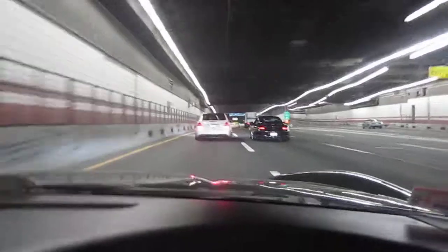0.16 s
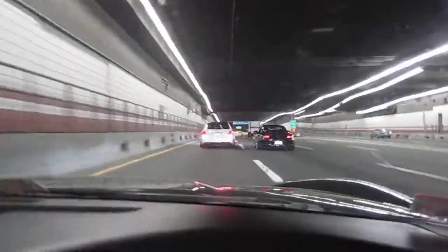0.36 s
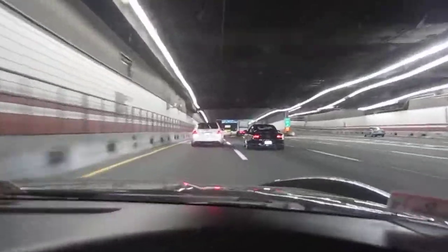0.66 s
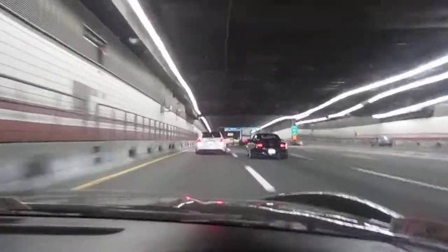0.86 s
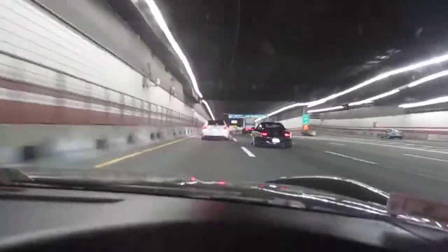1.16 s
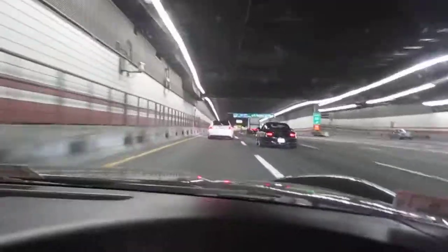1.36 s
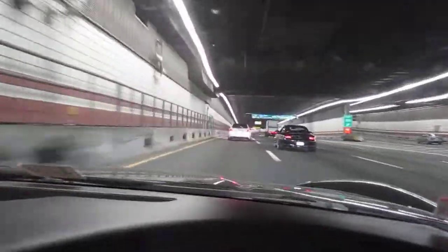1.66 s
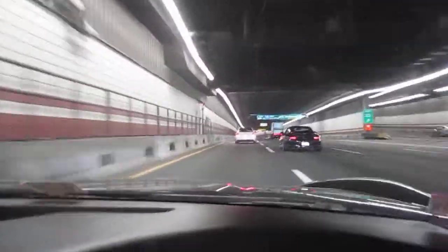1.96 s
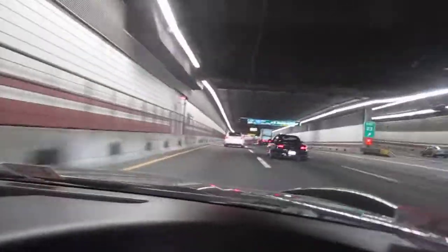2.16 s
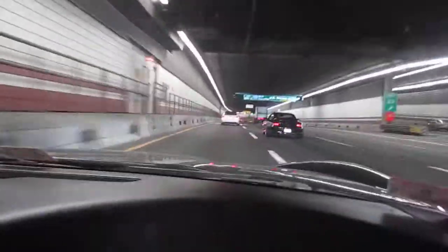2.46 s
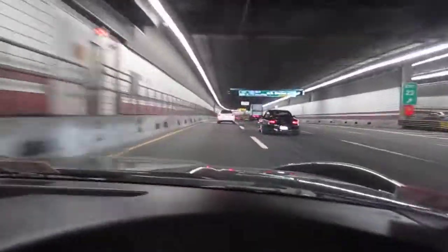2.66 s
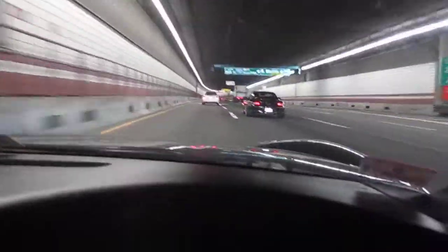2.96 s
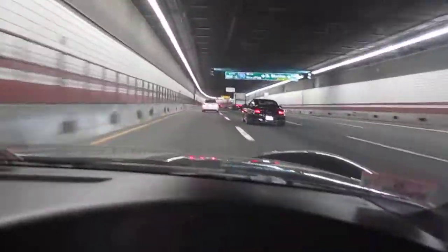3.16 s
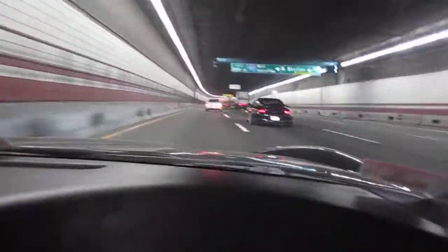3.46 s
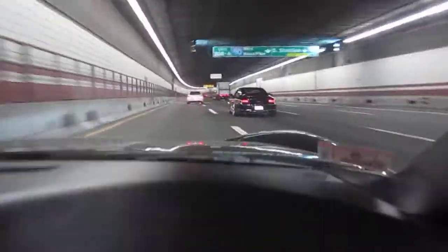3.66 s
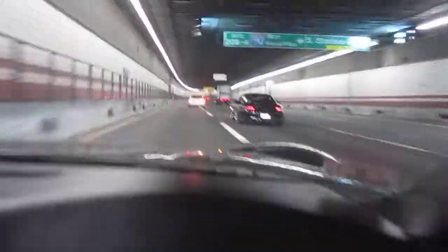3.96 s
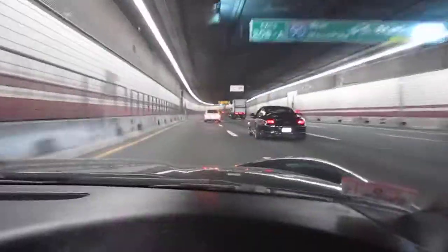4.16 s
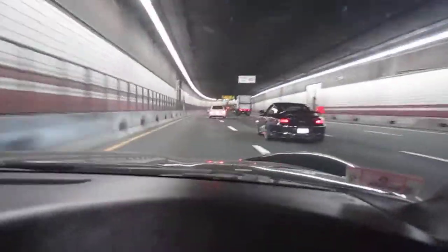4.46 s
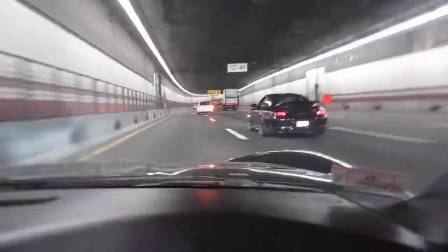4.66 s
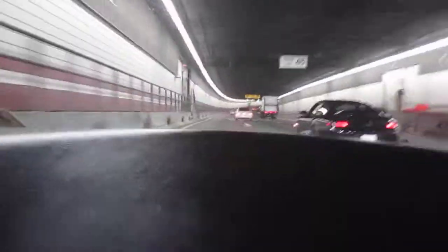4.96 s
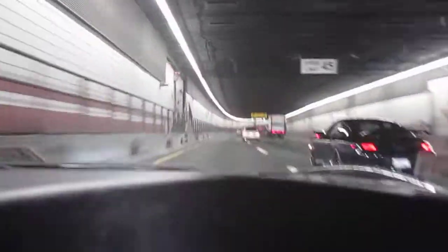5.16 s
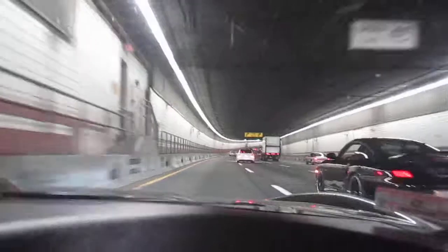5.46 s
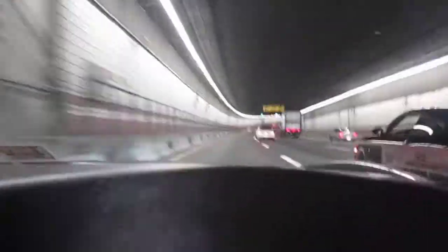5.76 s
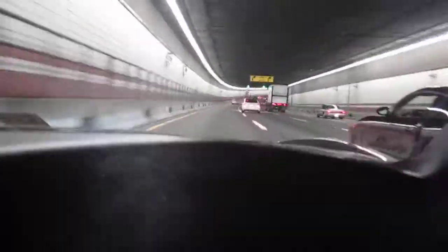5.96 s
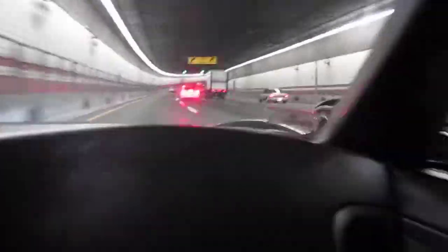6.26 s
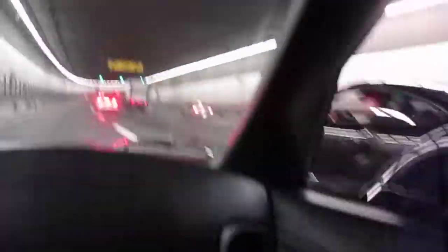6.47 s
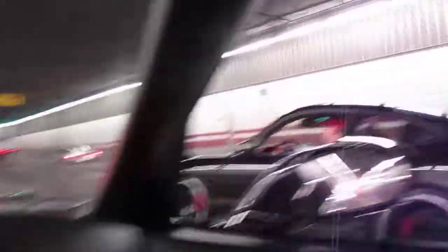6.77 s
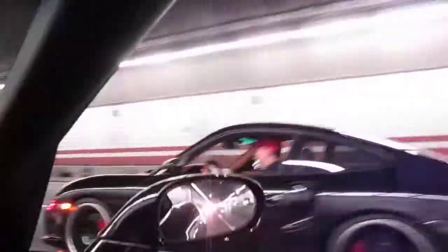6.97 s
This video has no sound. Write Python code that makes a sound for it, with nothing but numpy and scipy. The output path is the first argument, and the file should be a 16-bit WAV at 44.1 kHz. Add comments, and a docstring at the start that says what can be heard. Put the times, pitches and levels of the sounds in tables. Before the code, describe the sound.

The microphone sits inside a sports car driving through a road tunnel with the side window open. From the start a deep, uneven engine boom mixes with tyre roar, hissing air and low gusts, while another car's echoing exhaust rises slightly farther ahead. At about 2 seconds the engine pulls hard, growing louder and climbing steadily in pitch, with a snarl from around 3.7 seconds. At 4.6 seconds the throttle closes with a short low burble and the car coasts. From about 5 seconds another car draws alongside, its rough note falling in pitch, with a faint thin whine and swelling tyre noise. At 6.2 seconds the window thumps shut with a few quick knocks, and the hiss cuts off. A dull, muffled rumble of road and engines remains, with a few close ticks of trim, until about 7 seconds.

```python
"""A V8 sports car in a road tunnel, heard from a microphone in the cabin with the side window open.
Its uneven firings boom and growl as it cruises, pulls from 2 s to 4.5 s, then coasts with a burble.
Tyre roar, wind and the exhausts of other fast cars come in through the gap, and one car draws alongside.
At 6.2 s the window thumps shut, leaving a dull rumble and a few ticks of trim close by."""
import sys
import numpy as np
from scipy import signal
from scipy.fft import rfft, irfft, next_fast_len
from scipy.io import wavfile

SR = 44100
rng = np.random.default_rng(int(sys.argv[2]) if len(sys.argv) > 2 else 0)


def materialize(psi):
    """Save the field psi as 16-bit PCM at rate SR to the path in sys.argv[1].

    A 1-D psi becomes a single channel; in a 2-D psi each row is a channel.
    """
    bounded = np.clip(np.atleast_2d(psi).T, -1, 1)
    quanta = np.round(bounded * 32767).astype(np.int16)
    wavfile.write(sys.argv[1], SR, quanta)


N = 313985
TIME = np.arange(N) / SR
SHUT_S, SEAL_S, SEAL_TAKES_S = 6.201, 6.335, 0.047   # the glass meets its frame, then the seal seats
APPROACH_S, APPROACH_TAKES_S = 5.14, 0.89   # middle and length of the other car's approach


# Four-stroke cycle rate of the car carrying the microphone: time_s, cycle_hz
ENGINE_SPEED = [(0, 28.5), (1.05, 28.5), (1.75, 29.07), (2.25, 30.65), (3, 33.86), (3.75, 37.2), (4, 38.6),
                (4.55, 40.6), (5.1, 39.85), (7.12, 38.4)]
def cycle_hz():
    """The V8 fires all eight cylinders once per cycle."""
    return in_time(ENGINE_SPEED)[0]


# Booms at the seat, by cycle multiple: cruising_db, easing_on_db, pulling_db, coasting_db
BOOMS = {2: (-36, -43, -30, -47), 4: (-47, -61, -27, -35.5), 5: (-36, -40.5, -30.5, -45.5),
         6: (-34.5, -34.5, -42, -45.5), 8: (-34.5, -27.5, -29, -34)}
# Cabin air resonances and one dead spot at the microphone: centre_hz, width_hz, lift_db
CABIN_MODES = [(75.6, 4.5, -8), (142.2, 17.2, 8.5), (196, 17.5, 11.5), (233.6, 29, 4.5)]
# Waver of the booms: cruising_depth, easing_on_depth, pulling_depth, coasting_depth
BOOM_WAVER = (0.21, 0.14, 0.11, .2)
def engine_booms(phase):
    """Low multiples of the cycle rate line up in one throb per cycle and fill the cabin."""
    edge_hz = np.interp(sealed(), [0, 1], [263.5, 189])   # booms above this fade
    booms = 0
    for k, levels_db in BOOMS.items():
        hz = k * cycle_hz()
        fade_db = 34 * np.maximum(np.log2(hz / edge_hz), 0)
        db = by_throttle(*levels_db) + snarl_db(k) + lift_db(hz, CABIN_MODES) - fade_db
        waver = 1 + by_throttle(*BOOM_WAVER) * drift(6.5)
        booms -= from_db(db + 0.16) * np.sqrt(2) * np.cos(k * phase) * waver
    pulling = by_throttle(0, 0, 0.99, 0)   # only the hard pull wakes the tunnel
    return (1 - pulling) * booms + tunnel(pulling * booms, wet=0.07)


# The stand-out lines of the exhaust, heard from the seat: cycle_multiple, relative_db
GROWL_LINES = [(3, -37.5), (7, -36), (9, -43), (10, -37.5), (11, -37), (12, -43), (13, -37.5), (14, -45),
               (15, -46), (16, -45.5), (18, -46), (19, -44), (20, -44.5), (21, -40.5), (22, -47),
               (24, -42.5), (28, -46), (29, -48)]
# Exhaust pipe resonances: centre_hz, width_hz, lift_db
PIPE_MODES = [(216, 33, 6), (346, 14, 3), (391.2, 13.6, 6), (730, 9.6, 3.5), (870, 65, 4.5)]
def exhaust_growl(phase):
    """Unevenly spaced firings give lines at multiples of the cycle rate, lifted by the pipe."""
    growl = 0
    for k in range(2, 42):
        if k in BOOMS:
            continue
        line_db = dict(GROWL_LINES).get(k, -51.5 - 3.5 * np.log2(k / 20))
        db = line_db + snarl_db(k) + lift_db(k * cycle_hz(), PIPE_MODES)
        waver = 1 + 0.15 * drift(5.9)   # reflections off the passing walls
        growl += from_db(db) * partial(phase, k) * waver
    return from_db(load_db() - 1.4) * growl


# Shift in the exhaust's balance, by cycle multiple: change_db
SNARL = {6: 11, 7: -4, 8: 4, 9: 3, 10: 4, 11: -1, 12: 2, 13: -2, 14: 3, 15: 4, 20: 6, 24: -6, 28: -5}
def snarl_db(k):
    """The exhaust snarls from near the top of the pull until the pedal lifts."""
    return SNARL.get(k, 0) * ramp(3.73, 0.3) * (1 - ramp(*PEDAL_MOVES[-1]))


# Exhaust strength by throttle: cruising_db, easing_on_db, pulling_db, coasting_db
EXHAUST_LOAD = (-18, -19, -2.77, -14)
def load_db():
    """The exhaust grows with throttle and speed, and drops behind sealed glass."""
    return by_throttle(*EXHAUST_LOAD) + 11.5 * speed_octaves() - 22 * sealed()


# The driver eases on, pulls hard, then lifts off: middle_s, length_s
PEDAL_MOVES = [(1.04, 0.17), (2.08, 0.28), (4.58, 0.34)]
def by_throttle(*values):
    """Move from one value to the next with each move of the pedal."""
    return values[0] + sum(step * ramp(*move) for step, move in zip(np.diff(values), PEDAL_MOVES))


# Exhaust burble, heard from the seat: middle_s, length_s, pitch_hz, width_hz, level_db
BURBLE = (4.62, .28, 114, 22, -27.5)
def overrun():
    """A short low burble as the throttle closes."""
    s, length, hz, width_hz, db = BURBLE
    return from_db(db) * bell(s, length) * drone(hz, width_hz)


# The car that draws up to the door, close and nearly dry: time_s, firing_hz, level_db
BESIDE_TRACK = [(0, 194, -71), (4.9, 199.1, -79), (5.3, 190, -27.5), (5.55, 158.1, -27), (5.77, 138, -21.5),
                (5.95, 129.9, -35), (6.3, 116.8, -37), (6.6, 103.9, -34.5), (7.12, 111.5, -40)]
# Its exhaust, by firing multiple: relative_db
BESIDE_TONE = {1: 0, 2: -17, 3: -22, 4: -17.5, 5: -29}
# A thin whine as it nears: time_s, pitch_hz, level_db
WHINE_TRACK = [(5.2, 1036, -68), (5.45, 1088, -40), (5.7, 1088, -46), (6.05, 1177, -39), (6.2, 1190, -41)]
# A car farther up the tunnel, mostly echo: time_s, firing_hz, level_db
AHEAD_TRACK = [(0, 206.4, -26.5), (.45, 218.1, -36.5), (.8, 229, -30), (1.1, 237.6, -36), (1.6, 249.8, -37),
               (2.2, 250.4, -52), (4.2, 253, -42), (5.2, 239.5, -38), (6.1, 236.9, -34)]
# Its exhaust, by firing multiple: relative_db
AHEAD_TONE = {1: -6, 2: 0, 3: -15, 4: -14, 6: -21}
def other_car(track, harmonics, jitter, rough, wet):
    """Another car's note, unsteady in pitch and level, smeared by the tunnel."""
    hz, db = in_time(track)
    phase = turning(hz * (1 + jitter * drift(16.45)))
    note = sum(from_db(level) * partial(phase, k) for k, level in harmonics.items())
    return tunnel(from_db(db) * rms_one(note * (1 + rough * drift(40))), wet)


# Tunnel roar and tyre noise at the open window, beside the microphone: frequency_hz, relative_db
ROAR_SPECTRUM = [(200, -18), (280, 3), (325, 0.5), (400, 1.5), (475, 3.5), (560, -2), (660, -6), (790, -1),
                 (920, -4.5), (1100, -8.5), (1600, -48)]
TYRE_SPECTRUM = [(650, 2.5), (880, -0.5), (1020, 1.5), (1300, 0.5), (1550, -3), (2100, -7.5), (2800, -15.5),
                 (4000, -42), (7000, -48)]
# Air hiss and edge sizzle at the gap: frequency_hz, relative_db
HISS_SPECTRUM = [(1200, 0.5), (2100, 4), (3100, 4.5), (4000, 1), (5100, -1.5), (6200, -5.5), (7400, -13.5),
                 (9500, -18.5), (13000, -50)]
SIZZLE_SPECTRUM = [(5000, -11.5), (6500, 0.5), (7800, -0.5), (9500, -2), (11000, -5.5), (13000, -13),
                   (15700, -24.5)]
# The stream shifts as the car speeds up and moves over: middle_s, length_s, hiss_step_db, sizzle_step_db
AIR_SHIFTS = [(1.1, .4, 0.73, 0), (1.86, .18, -4.5, -1.5), (3.8, 0.22, 3, 3.5), (4.53, 0.098, -2, -1.5),
              (4.95, 0.54, 3, 2.5)]
# Change of the roar by throttle: cruising_db, easing_on_db, pulling_db, coasting_db
ROAR_THROTTLE = (-0.44, 1, -0.38, -2.4)
def open_window(phase):
    """Tunnel roar, tyre noise and rushing air; the exhaust rasps in step with one bank's firings."""
    hiss_db = -37.5 + sum(step * ramp(s, length) for s, length, step, _ in AIR_SHIFTS)
    sizzle_db = -54 + sum(step * ramp(s, length) for s, length, _, step in AIR_SHIFTS)
    near = ramp(APPROACH_S, APPROACH_TAKES_S)
    roar_db = -28 + 4.9 * speed_octaves() + 0.3 * near + by_throttle(*ROAR_THROTTLE)
    tyre_db = -33.5 + 4 * speed_octaves() + 4.46 * near + 0.19 * (hiss_db - hiss_db.mean())
    slit = np.exp(np.minimum(TIME - SHUT_S, 0) / 0.11)   # the last slit hisses louder
    rasp = 1 + 0.31 * from_db(load_db()) * np.cos(4 * phase)
    eddies = from_db(1.3 * drift(290))   # shed at the edge of the glass
    roar = from_db(roar_db - 3) * noise(ROAR_SPECTRUM, flutter_db=0.7)
    tyres = from_db(tyre_db - 0.52) * noise(TYRE_SPECTRUM, flutter_db=0.48)
    hiss = from_db(hiss_db - 0.98 + 3.5 * slit) * noise(HISS_SPECTRUM, flutter_db=0.34)
    sizzle = from_db(sizzle_db + 0.6 + 7.5 * slit) * noise(SIZZLE_SPECTRUM, flutter_db=0.5)
    return (roar + tyres * eddies) * rasp + (hiss + sizzle) * eddies


# Modes of the side glass, close to the microphone: pitch_hz, relative_db, t60_s
PANE_MODES = [(238.6, -22, 0.04), (280, -8, 0.033), (348, -14, 0.04), (440, -12, 0.039), (514, -19, 0.045)]
def window_thump():
    """The pane thuds into its frame and rings briefly."""
    return sum(struck(SHUT_S - 0.004, hz, db + 1, t60) for hz, db, t60 in PANE_MODES)


# Glass and trim knocking within arm's reach: start_s, ring_db, pitch_hz, t60_s, thud_db
KNOCKS = [(6.1997, -21, 1800, .004, -32), (6.2094, -38, 5000, .002, -40), (6.215, -37, 4600, .002, -36),
          (6.2167, -30, 1300, .008, -40), (6.283, -35, 4000, .001, -15), (6.286, -38, 6500, .001, -22),
          (6.3055, -41, 5000, .001, -16), (6.3114, -25.5, 2700, .0015, -17),
          (6.3195, -36, 3000, .0012, -16), (6.4153, -42, 5000, .001, -22), (6.6126, -24, 4500, .0022, -32),
          (6.6131, -31, 2600, .004, -40), (6.756, -45, 7000, .001, -32), (6.864, -39, 4000, .001, -12),
          (6.8862, -41, 4000, .001, -17), (7.0515, -46, 5800, .006, -27)]
# The crack that starts each knock: frequency_hz, relative_db
CRACK_SPECTRUM = [(1000, -8), (2100, 7), (4600, 7), (8000, -3), (10500, -6), (12500, -15), (15000, -20)]
def trim_knocks():
    """Each knock is a dry crack, a brief ring of the trim and a thud of the door panel."""
    cracks = rings = thuds = 0
    for s, ring_db, hz, t60, thud_db in KNOCKS:
        cracks += (TIME > s) * decay(s, ring_db - 8.5, t60=0.002) * rng.standard_normal(N)
        rings += struck(s, hz, ring_db, t60)
        thuds += struck(s, hz=135, db=thud_db, t60=0.032)
    return colour(cracks, CRACK_SPECTRUM) + rings + thuds


# Faint rubs at the window's edge: middle_s, length_s, level_db
RUBS = [(6.351, 0.031, -58), (6.397, 0.036, -57)]
# Rubber on glass: frequency_hz, relative_db
RUB_SPECTRUM = [(3500, -14), (5500, -7), (7000, -4), (9000, -13), (11000, -19), (15000, -36)]
def seal_rubs():
    """The rubber seal rubs on the glass in two short hisses."""
    envelope = 0
    for s, length, db in RUBS:
        offset = np.minimum(np.abs(2 * (TIME - s) / length), 9)
        envelope += from_db(db) * np.exp(-offset ** 3)
    return envelope * noise(RUB_SPECTRUM, flutter_db=3.0)


# Road drones all around the microphone: cruising_hz, width_hz, relative_db, speed_follow_share
ROAD_DRONES = [(130.8, 10.7, 0.5, .95), (132.8, 19, -1.5, 0), (204, 21.7, 0, 0.01), (229.9, 20, -1.5, 0),
               (270, 8.9, -5.5, 0.02)]
# Wheels and exhaust of the car outside the door: frequency_hz, relative_db
NEIGHBOUR_SPECTRUM = [(70, -24), (86, -5), (108, 2), (135, 1.5), (170, -2.5), (200, 0.5), (250, -9),
                      (330, -25)]
def rumble():
    """Road and tyres drone in the cabin; the nearing car's rumble takes over in uneven puffs."""
    road = 0
    for hz, width_hz, db, follows in ROAD_DRONES:
        road += from_db(db) * np.sqrt(width_hz) * drone(hz * 2 ** (follows * speed_octaves()), width_hz)
    puffs = from_db(2.5 * np.sin(turning(44 + drift(3.05))))
    neighbour = from_db(2.5) * rms_one(noise(NEIGHBOUR_SPECTRUM, flutter_db=0.5) * puffs)
    ahead, near, at_door = 0.052, 0.34, 0.94   # the other car's share of the blend at each place
    share = ahead + (near - ahead) * ramp(APPROACH_S, APPROACH_TAKES_S)
    share += (at_door - near) * ramp(6.02, 0.34)
    mix = np.sqrt(1 - share) * rms_one(road) + np.sqrt(share) * neighbour
    return from_db(-27 - 3.5 * sealed()) * mix


# Gusts and rough stretches of road: middle_s, length_s, buffet_lift_db, rumble_lift_db
SWELLS = [(0.203, 0.32, 3, 5), (0.757, 0.17, 6.5, -0.5), (1.804, 0.15, 9, 3.5), (2.6, 0.74, 0, 1),
          (4.15, 0.35, 2, 1), (4.449, 0.2, 5, 0), (5.1, 0.61, 6, 1.5), (5.445, 0.2, 3, 4.5),
          (5.777, 0.85, 3.5, 3.5), (6.77, 0.15, 8, -0.5)]
# Buffeting air at the microphone: frequency_hz, relative_db
BUFFET_SPECTRUM = [(10, -18), (22, -8), (42, -4), (55, 1), (66, -8), (80, -8.5), (110, -14), (180, -23)]
def buffet_and_rumble():
    """Air buffets the cabin in gusts, and the rumble swells over rough road."""
    gust_db, road_db = sum(np.outer(lifts_db, bell(s, length)) for s, length, *lifts_db in SWELLS)
    buffet = from_db(-37.5 + gust_db + 2.1) * noise(BUFFET_SPECTRUM, flutter_db=0.5)
    return buffet + from_db(road_db) * rumble()


# The tunnel from behind the shut window: frequency_hz, relative_db
MUFFLED_SPECTRUM = [(200, 0), (280, 11), (330, 0), (520, 0), (700, 2), (900, 1.5), (1350, -0.5),
                    (1650, -13.5), (2100, -18.5), (2650, -27.5), (3100, -26), (4500, -37), (8200, -47),
                    (15000, -65)]
def behind_glass():
    """Dull outside noise leaks until the seal seats, then grows again as the other car comes level."""
    leaking_db = -29
    sealed_db = -35.5 + 8.5 * (TIME - SEAL_S)
    db = (1 - sealed()) * leaking_db + sealed() * sealed_db
    return from_db(db) * noise(MUFFLED_SPECTRUM, flutter_db=1.37)


def tunnel(x, wet, t60=0.98):
    """Dense echoes between tiled walls, mixed with the direct sound."""
    t = TIME[:2 * SR]
    tail = rng.standard_normal(len(t)) * from_db(-60 * t / t60)
    echoes = signal.fftconvolve(x, tail / np.linalg.norm(tail))[:N]
    return np.sqrt(1 - wet) * x + np.sqrt(wet) * echoes


def sealed():
    """From 0 to 1 as the window seal seats."""
    return ramp(SEAL_S, SEAL_TAKES_S)


def speed_octaves():
    """Speed, in octaves above cruising."""
    return np.log2(cycle_hz() / ENGINE_SPEED[0][1])


def lift_db(hz, modes):
    """How far these resonances lift a line at this pitch."""
    return sum(top / (1 + (2 * (hz - centre) / width) ** 2) for centre, width, top in modes)


def struck(s, hz, db, t60):
    """One mode, set ringing at time s."""
    return decay(s, db, t60) * np.sin(2 * np.pi * hz * np.maximum(TIME - s, 0))


def decay(s, db, t60):
    """A gain that dies away from time s."""
    return from_db(db - 60 * np.clip((TIME - s) / t60, 0, 3))


def drone(hz, width_hz):
    """A narrow band of noise around a pitch that may move; rms 1."""
    phase = turning(hz + np.zeros(N))
    return rms_one(drift(width_hz) * np.cos(phase) + drift(width_hz) * np.sin(phase))


def noise(spectrum, flutter_db):
    """Coloured turbulence with a fluttering level; rms 1."""
    return rms_one(colour(rng.standard_normal(N), spectrum) * from_db(flutter_db * drift(18)))


def colour(x, spectrum):
    """Filter by a spectrum table, falling 30 dB per octave beyond its ends."""
    hz, db = np.transpose(spectrum)
    size = next_fast_len(N)
    octave = np.log2(np.maximum(np.fft.rfftfreq(size, 1 / SR), 1))
    beyond = np.abs(octave - np.clip(octave, np.log2(hz[0]), np.log2(hz[-1])))
    gain = from_db(np.interp(octave, np.log2(hz), db) - 30 * beyond)
    return irfft(rfft(x, size) * gain, size)[:N]


def drift(rate_hz):
    """A smooth random wander of spread 1."""
    hop, settle = 40, 2000
    pole = np.exp(-2 * np.pi * rate_hz * hop / SR)
    white = rng.standard_normal(N // hop + settle + 2)
    slow = signal.lfilter([1], [1, -2 * pole, pole * pole], white)[settle:]
    return np.interp(np.arange(N) / hop, np.arange(len(slow)), rms_one(slow))


def turning(hz):
    """Phase of something that turns at this rate."""
    return 2 * np.pi * np.cumsum(hz) / SR


def partial(phase, k):
    """The k-th multiple of a turning phase; rms 1."""
    return np.sqrt(2) * np.sin(k * phase + rng.uniform(0, 2 * np.pi))


def ramp(s, length):
    """From 0 to 1 over this length of time, centred on s."""
    return np.clip((TIME - s) / length + 0.5, 0, 1)


def bell(s, length):
    """A smooth swell of height 1, centred on s."""
    return np.exp(-(2 * (TIME - s) / length) ** 2)


def in_time(rows):
    """One curve per column, joined by straight lines."""
    s, *columns = np.transpose(rows)
    return [np.interp(TIME, s, column) for column in columns]


def from_db(db):
    """Decibels to gain."""
    return 10 ** (np.asarray(db) / 20)


def rms_one(x):
    """Scale to rms 1."""
    return x / np.sqrt(np.mean(x ** 2) + 1e-20)


def scene():
    """One microphone in the cabin, with the window open and then shut."""
    phase = turning(cycle_hz() * (1 + 0.0021 * drift(7.3)))
    engine = engine_booms(phase) + exhaust_growl(phase) + overrun()
    beside = other_car(BESIDE_TRACK, BESIDE_TONE, jitter=0.0221, rough=0.82, wet=0.078)
    whine = other_car(WHINE_TRACK, {1: 0}, jitter=0.0024, rough=0.43, wet=0.43)
    ahead = other_car(AHEAD_TRACK, AHEAD_TONE, jitter=0.019, rough=0.69, wet=0.84)
    shut = ramp(SHUT_S, 0.0038)
    outside = (1 - shut) * (ahead + whine + open_window(phase)) + shut * behind_glass()
    shutting = window_thump() + trim_knocks() + seal_rubs()
    return (engine + beside + outside + shutting + buffet_and_rumble())[None]


def record(dry):
    """The highest peaks are rounded and the top treble is cut."""
    ceiling, cutoff_hz = 0.39, 15700
    rounded = dry / (1 + (dry / ceiling) ** 4) ** (1 / 4)
    return signal.sosfilt(signal.ellip(10, 0.2, 80, cutoff_hz, fs=SR, output="sos"), rounded)


dry = scene()
out = record(dry)
materialize(out)
```